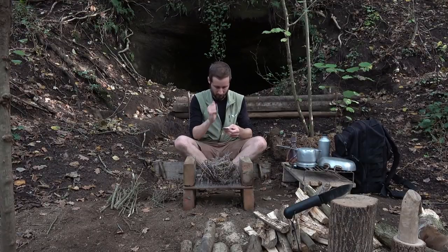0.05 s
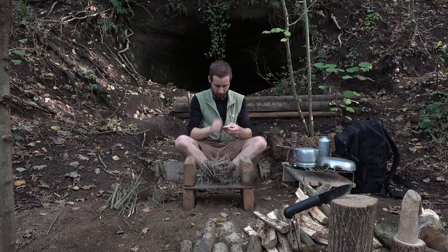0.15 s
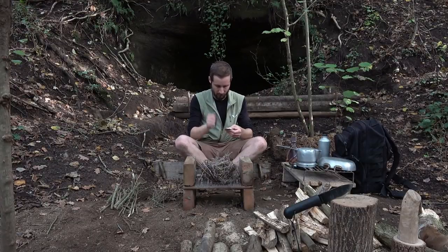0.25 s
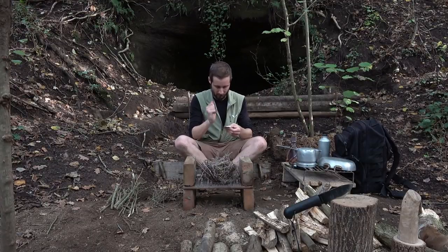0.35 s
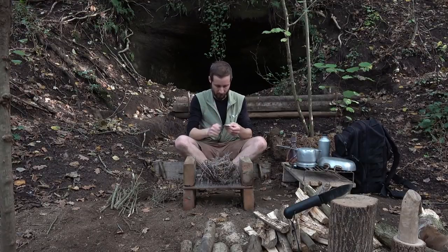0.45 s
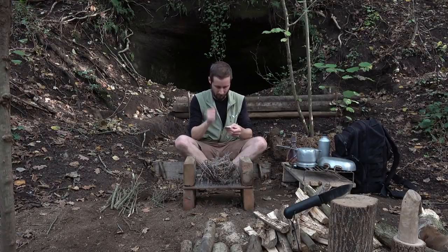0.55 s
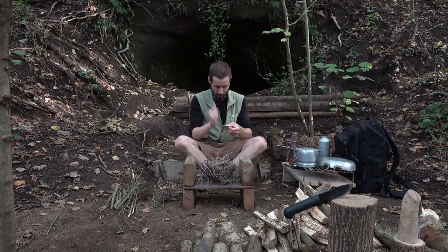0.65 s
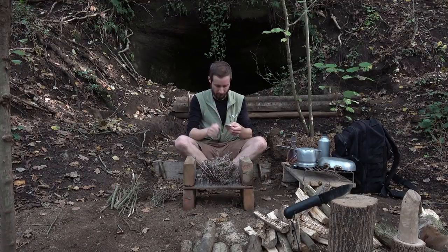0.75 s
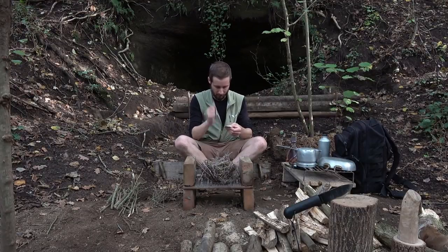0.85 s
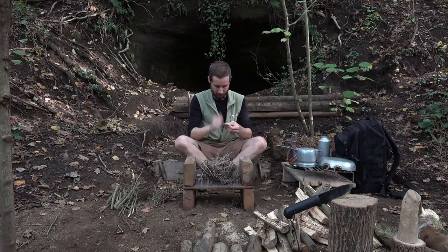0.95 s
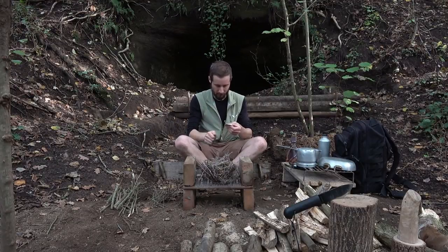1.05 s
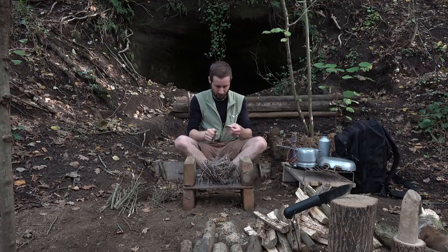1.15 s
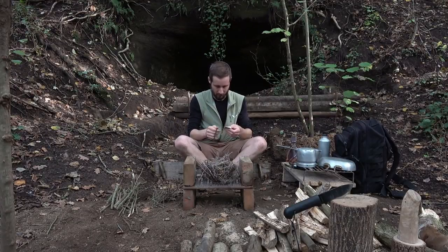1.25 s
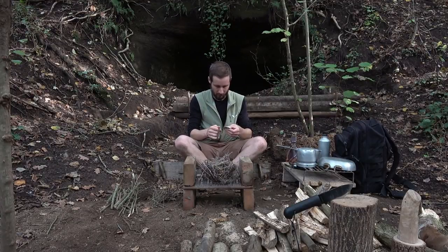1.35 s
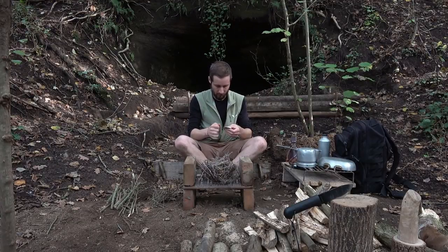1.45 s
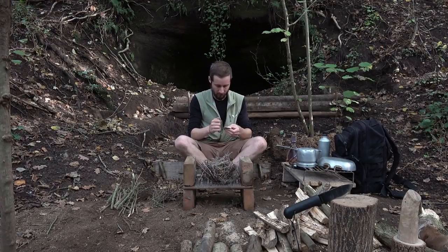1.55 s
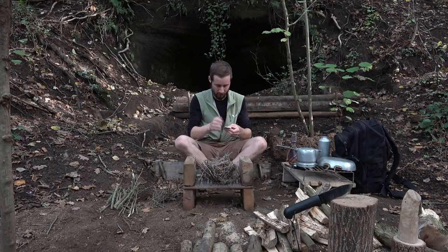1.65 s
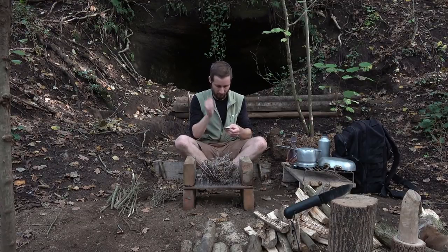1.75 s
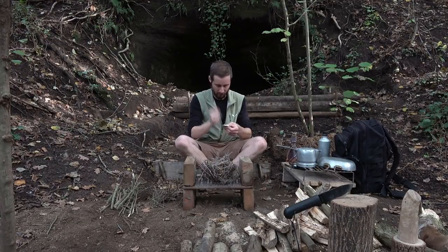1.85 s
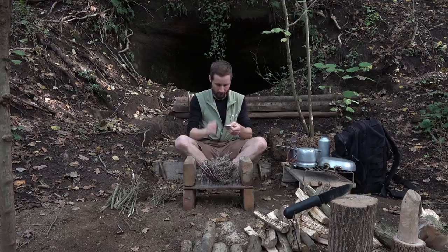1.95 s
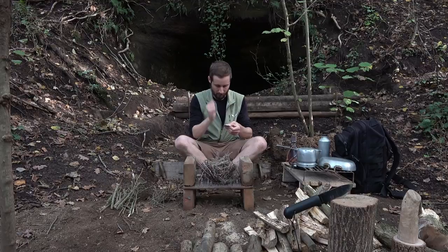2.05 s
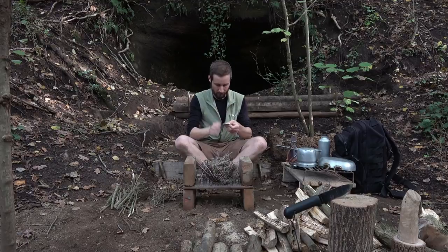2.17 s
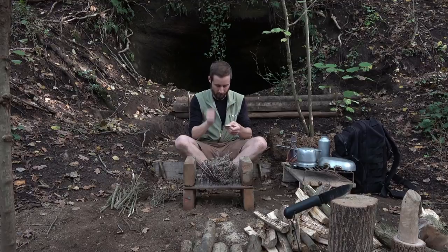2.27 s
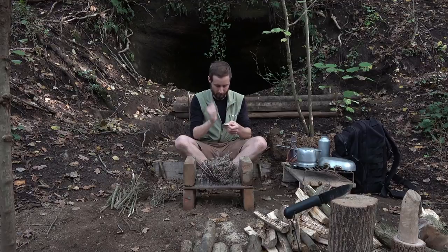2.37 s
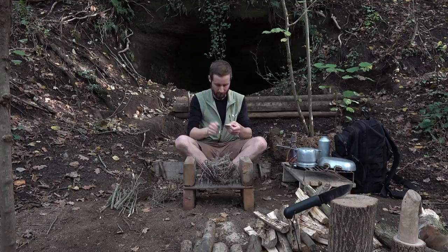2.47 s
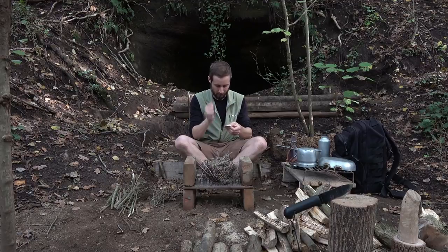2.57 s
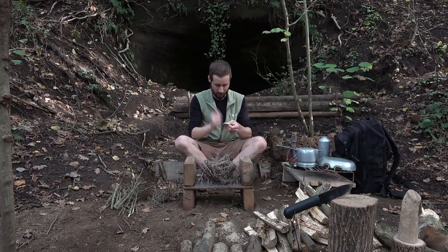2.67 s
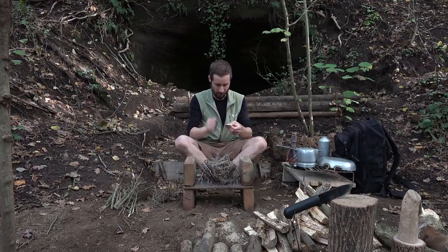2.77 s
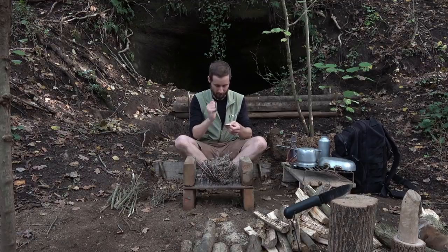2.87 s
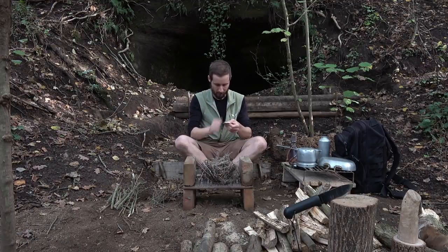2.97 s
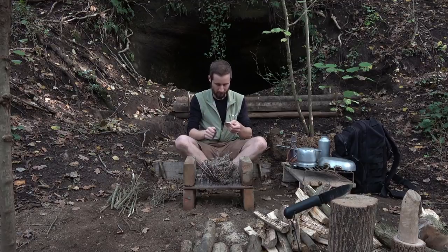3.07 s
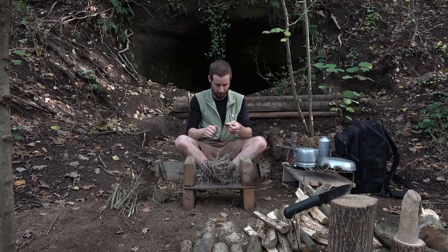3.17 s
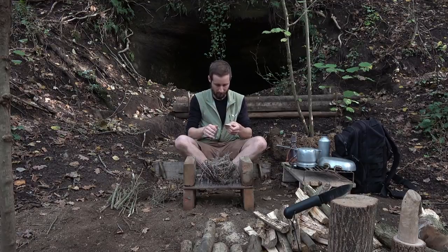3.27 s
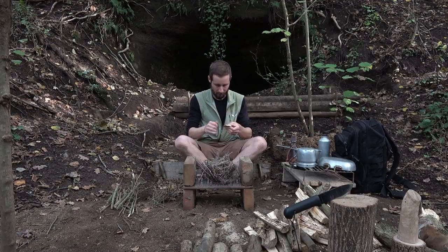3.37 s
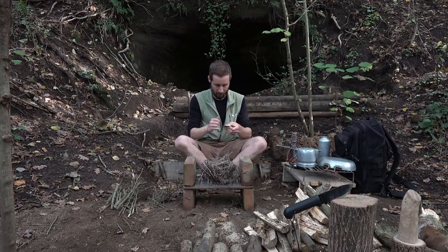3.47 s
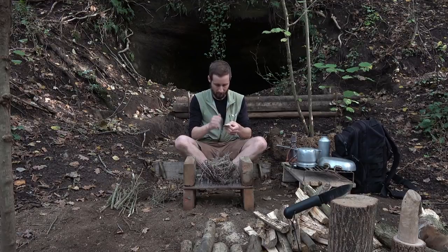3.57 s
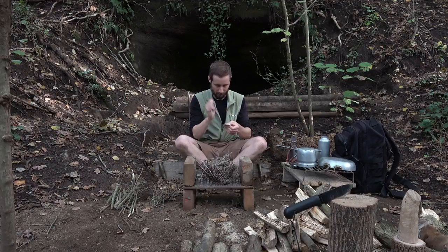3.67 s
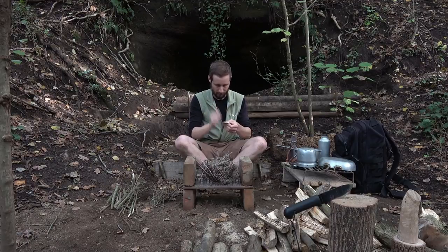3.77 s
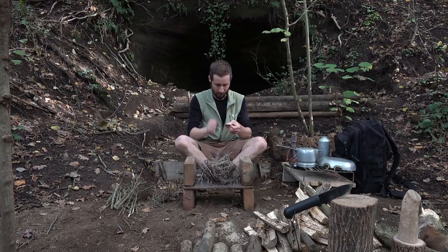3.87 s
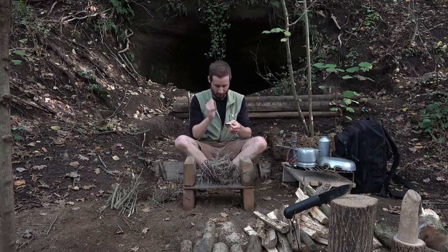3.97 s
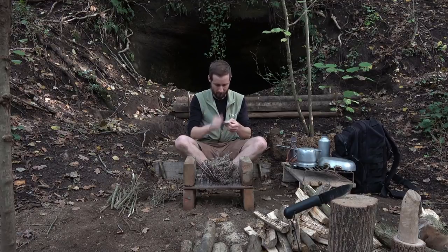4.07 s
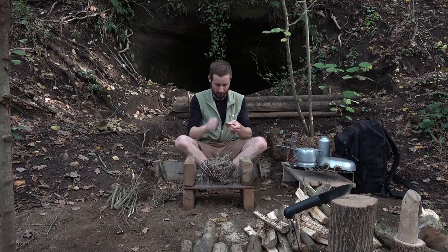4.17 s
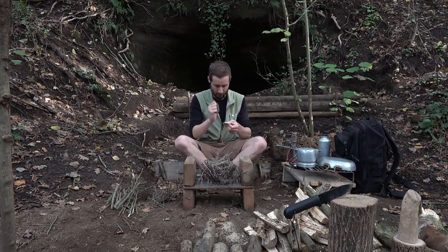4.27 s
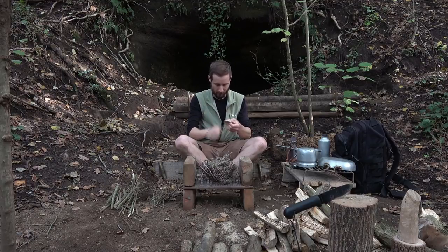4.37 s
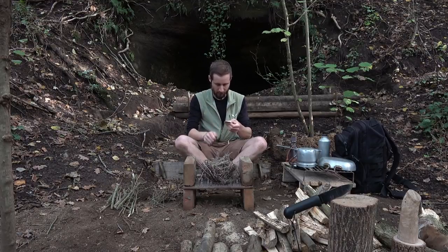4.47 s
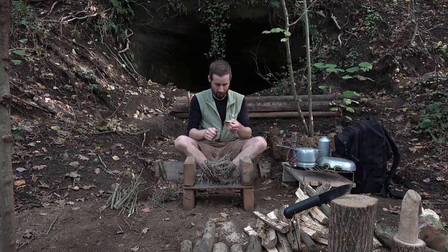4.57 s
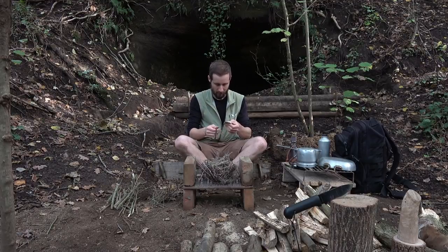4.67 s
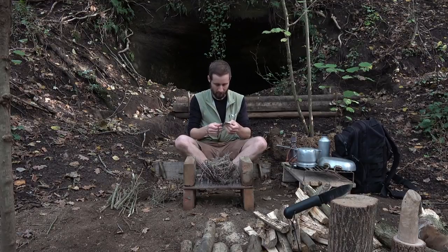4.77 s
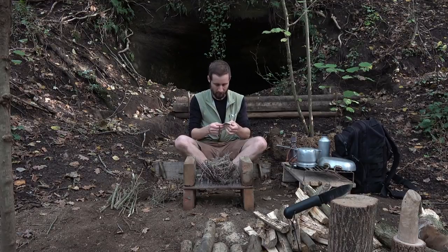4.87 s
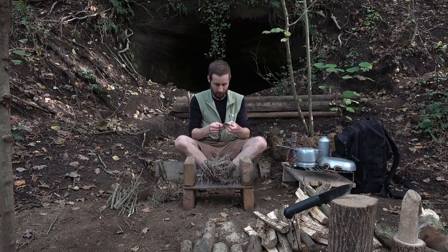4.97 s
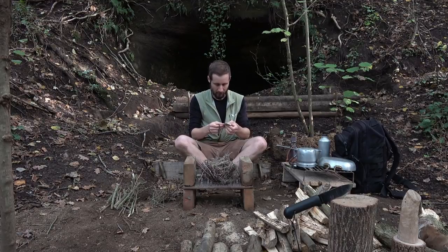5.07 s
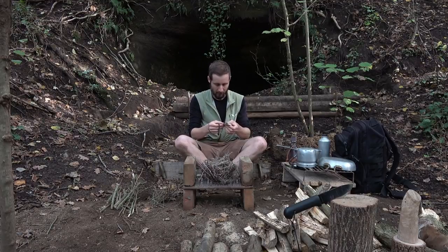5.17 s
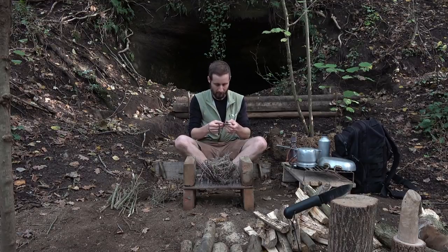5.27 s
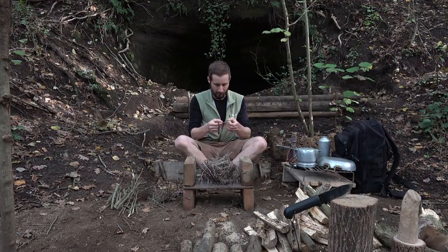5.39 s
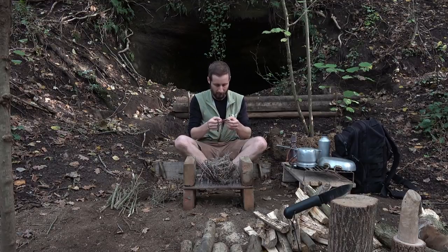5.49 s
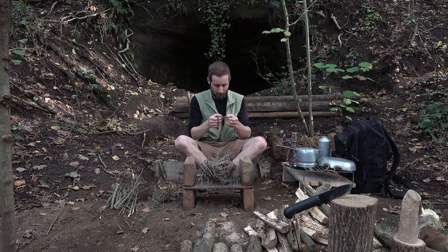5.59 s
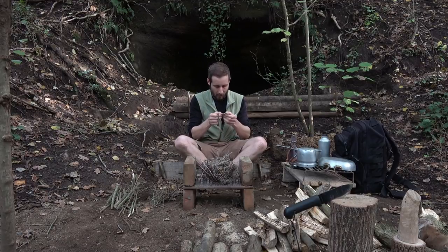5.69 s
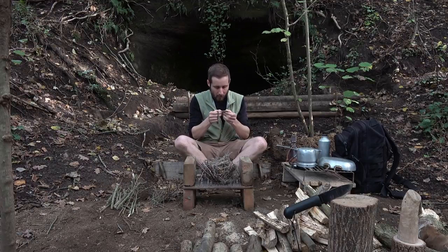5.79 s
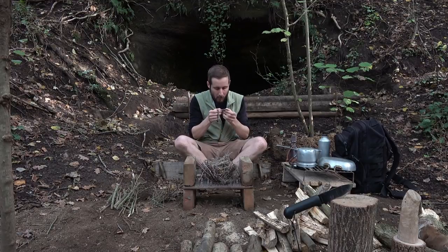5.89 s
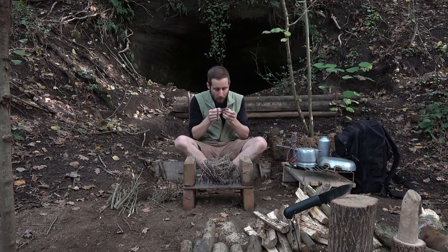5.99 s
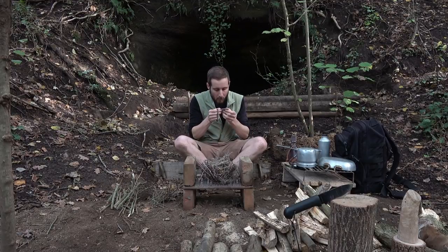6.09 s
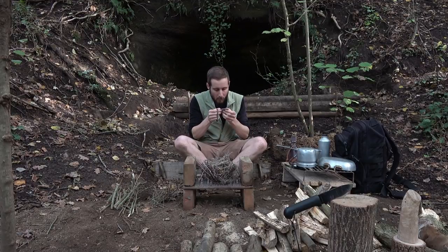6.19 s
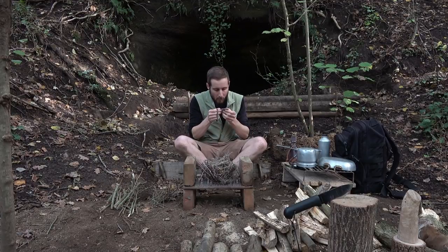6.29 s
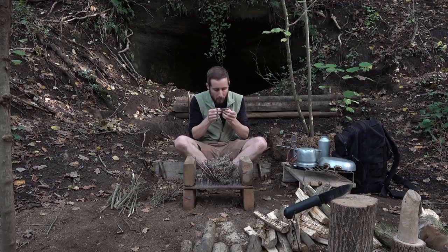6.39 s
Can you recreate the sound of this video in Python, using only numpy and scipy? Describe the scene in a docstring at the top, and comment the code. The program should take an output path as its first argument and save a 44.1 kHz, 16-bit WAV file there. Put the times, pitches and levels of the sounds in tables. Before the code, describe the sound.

Sharp, bright clinks of steel struck against flint come in three short, even runs over still woodland air.

```python
"""A steel striker hits a flint in three bursts, a few metres away in a woodland hollow.
Each stroke is a sharp blow; the steel then chatters along the stone's edge and clinks.
Afterwards the flint ticks once in the fingers. Ground, banks and trees scatter the sound.
Underneath: still forest air and a brief low rumble."""
import sys
import numpy as np
from scipy import signal
from scipy.fft import rfft, irfft
from scipy.io import wavfile

SR = 44100
rng = np.random.default_rng(int(sys.argv[2]) if len(sys.argv) > 2 else 0)


def materialize(psi):
    """Save the field psi as 16-bit PCM at rate SR to the path in sys.argv[1].

    A 1-D psi becomes a single channel; in a 2-D psi each row is a channel.
    """
    bounded = np.clip(np.atleast_2d(psi).T, -1, 1)
    quanta = np.round(bounded * 32767).astype(np.int16)
    wavfile.write(sys.argv[1], SR, quanta)


N = 283994


def stroke(strength_db, length_s, scrape_db, glance_db, clink_db, note_hz, note_db):
    """Blow and scrape ring steel and flint. Returns the direct sound and that sent into the wood."""
    # short-lived peaks colouring the direct crack, partly from reflections off hands, knees
    # and ground: f/Hz, width/Hz, gain/dB
    colour_peaks = [(320, 160, -16), (945, 130, 7.5), (1480, 480, 10.5), (2180, 410, 10), (3180, 210, 6.5),
                    (4320, 150, 7.5), (5100, 1600, 10), (5220, 230, 0), (6200, 130, -11.5), (8000, 830, 5),
                    (9090, 240, -5), (12100, 2300, -2.5), (12700, 2000, -1), (15500, 630, -2)]
    # steel modes (finger-damped clink, highest pings, lower ring): f/Hz, level/dB, t60/s
    clink_modes = [(7150, -4, .04), (7220, 0, .052), (7295, -1, .056), (7370, -2, .048), (7480, -6, .025),
                   (7950, -8, .003)]
    ping_modes = [(9110, -2, .05), (12950, -1, .045), (15230, 0, .055), (15400, -3, .04)]
    low_modes = [(4420, -5, .05), (4570, -1, .1), (4750, 1, .14), (4880, -2, .06), (5030, -3, .05),
                 (5220, -5, .04)]
    t = np.arange(SR // 5) / SR
    bands_db, ring_db, ping_db = voicing(strength_db, length_s, scrape_db, glance_db)
    force = unit_energy(blow(t)) + from_db(scrape_db) * unit_energy(scrape(t, length_s))
    clink = at_level(ring(force, clink_modes, detune=.0023), strength_db + clink_db)
    ping = at_level(ring(force, ping_modes, vary_db=3.5, detune=.0053), ping_db)
    low_ring = at_level(ring(force, low_modes, vary_db=3, detune=.0034), ring_db)
    # the flint's own note, set by where it is hit and how it is held
    note = at_level(ring(force, [(note_hz, 0, .024)]), strength_db + note_db)
    tones = clink + ping + note
    coloured = detour_notches(resonate(force, colour_peaks))
    ahead = balance_bands(coloured, *bands_db) + tones + from_db(-9.5) * low_ring
    around = balance_bands(force, *bands_db) + from_db(-3) * tones + low_ring
    return ahead, around


def voicing(strength_db, length_s, scrape_db, glance_db, usual_db=-36, contact_loss_db_per_s=279.5):
    """Levels/dB of a stroke. A hard, clean blow cracks more and knocks less; contact damps the ring."""
    harder_db = strength_db - usual_db
    tilt_db = 1.19 + .12 * harder_db - .13 * scrape_db
    bands_db = strength_db + np.array([-tilt_db, tilt_db, glance_db])   # knock, crack, fizz
    ring_db = strength_db - 2.5 - contact_loss_db_per_s * length_s
    ping_db = strength_db - 6.5 + glance_db - .61 * harder_db
    return bands_db, ring_db, ping_db


def blow(t, smear_s=.0014, bounce=.55):
    """One hard impact, smeared by rebounds and by nearby hands and knees."""
    force = signal.unit_impulse(len(t))
    for k in range(3):   # all-pass stages
        gap = np.zeros(int(SR * smear_s * rng.uniform(.8, 1.2) / 2 ** k))
        force = signal.lfilter(np.r_[-bounce, gap, 1], np.r_[1, gap, -bounce], force + 1e-18)
    return cut(force, 100, "high", order=1)


def scrape(t, length_s, slip_s=.0032, slip_decay_s=.0014, fade_db=6.5, low_hz=1200):
    """Steel catches and slips along the edge; each slip breaks off a puff of grit."""
    slips_s = slip_s + np.cumsum(np.r_[0, slip_s * rng.uniform(.55, 1.45, 15)])
    sizes = from_db(2 * rng.standard_normal(len(slips_s)) - fade_db * slips_s / length_s)
    pressure = sum(size * (t >= s) * np.exp(-abs(t - s) / slip_decay_s)
                   for s, size in zip(slips_s, sizes) if s <= max(length_s, slip_s))
    return cut(grit(t, per_s=12000, spread_db=3) * pressure, low_hz, "high")


def grit(t, per_s, spread_db):
    """Impulses of uneven size at random times."""
    hits = rng.random(len(t)) < per_s / SR
    signs = rng.choice([-1, 1], len(t))
    return hits * signs * from_db(spread_db * rng.standard_normal(len(t)))


def ring(force, modes, vary_db=0, detune=0, skirt_hz=500):
    """Decaying modes; the grip varies level and pitch per stroke by vary_db and detune."""
    out = 0
    for hz, db, t60_s in modes:
        hz = hz * (1 + detune * rng.normal())
        r, w = from_db(-60 / (t60_s * SR)), 2 * np.pi * hz / SR
        mode = signal.lfilter([1], [1, -2 * r * np.cos(w), r * r], force + 1e-18)
        mode = resonate(mode, [(hz, skirt_hz, 0)])   # brief swell, narrow spectrum
        out = out + from_db(db + vary_db * rng.normal()) * unit_energy(mode)
    return out


def balance_bands(x, knock_db, crack_db, fizz_db, knock_hz=2700, fizz_hz=10000):
    """Set three band levels: a square blow knocks, a glancing one is thin and fizzes."""
    knock, rest = cut(x, knock_hz, "low", order=5), cut(x, knock_hz, "high", order=5)
    crack, fizz = cut(rest, fizz_hz, "low", order=5), cut(rest, fizz_hz, "high", order=5)
    return at_level(knock, knock_db) + at_level(crack, crack_db) + at_level(fizz, fizz_db)


def detour_notches(x):
    """Detours past hands and knees meet the direct sound out of phase."""
    # cancelled bands: f/Hz, width/Hz
    notches = [(620, 160), (1135, 150), (1750, 150), (5900, 200), (10100, 1200)]
    for hz, width_hz in notches:
        x = signal.lfilter(*signal.iirnotch(hz, hz / width_hz, fs=SR), x + 1e-18)
    return x


def flint_tick(db, soft_hz=3900):
    """A light, dull touch of the stone in the fingers."""
    # flint resonances: f/Hz, width/Hz, gain/dB
    flint_bands = [(1990, 95, 2.06), (2310, 142, 11), (2820, 160, 9.9), (3340, 90, 5.7)]
    touch = blow(np.arange(SR // 10) / SR, smear_s=.0002)
    return at_level(cut(resonate(touch, flint_bands), soft_hz, "low", order=8), db)


def near_echoes(x, gain_db=-14.5, decay_s=.018, low_hz=1100):
    """Nearby ground, logs and camp gear return a quick spray of echoes."""
    t = np.arange(SR // 5) / SR
    spray = grit(t, per_s=2600, spread_db=1) * (t > .005) * np.exp(-t / decay_s)
    response = unit_energy(cut(spray, low_hz, "high"))
    return from_db(gain_db) * signal.fftconvolve(x, response)[:len(x)]


def woodland(x, gain_db=-17, build_s=.0064):
    """Banks and trunks give a diffuse tail that dies band by band."""
    # scatter: f/Hz, relative density/dB, t60/s
    scatter = [(300, -17.5, 0.16), (900, -9, 0.33), (1600, -9, 0.5), (2960, -5, .46), (4030, 3.5, 0.21),
               (4750, 3.5, 0.47), (6400, 0.5, 0.42), (7100, -0.5, 0.43), (8000, -5, 0.47),
               (10000, -7.5, 0.23), (12500, -7.5, 0.61), (14100, -6, 0.35), (15300, 3, 0.32)]
    t = np.arange(SR * 3 // 4) / SR
    edges_hz = np.geomspace(250, 17000, 37)
    tail = 0
    for low, high in zip(edges_hz, edges_hz[1:]):
        hz = np.sqrt(low * high)
        decay = from_db(at_hz(scatter, hz) - 60 * t / at_hz(scatter, hz, column=2))
        tail = tail + cut(rng.standard_normal(len(t)), [low, high], "band") * decay
    tail = tail * (1 - np.exp(-(t / build_s) ** 2))
    return from_db(gain_db) * signal.fftconvolve(x, unit_energy(tail))[:len(x)]


def rumble(attack_s=.035, release_s=.065):
    """Swells of low noise rise, hold and die away."""
    # swells: t/s, hold/s, level/dB
    swells = [(2.19, .025, -55.5), (2.32, 1.2, -72.5), (3.61, .03, -68.5)]
    # rumble spectrum: f/Hz, relative density/dB
    spectrum = [(30, -23), (55, -9), (78, -3), (120, -4.5), (180, -12.5), (300, -22), (700, -24.5),
                (2000, -72)]
    t = np.arange(N) / SR
    envelope = 0
    for s, hold_s, db in swells:
        before_s, after_s = np.maximum(s - t, 0), np.maximum(t - s - hold_s, 0)
        envelope = envelope + from_db(db) * np.exp(-before_s / attack_s - after_s / release_s)
    return envelope * noise(spectrum)


def forest_air(level_db=-69.5):
    """Still air: faint, steady, mostly low noise."""
    # air spectrum: f/Hz, relative density/dB
    spectrum = [(13, -41), (22, -3), (55, -5), (109, -11.5), (229, -14), (270, -17), (310, -17), (815, -19),
                (1540, -26), (1860, -29), (3150, -32.5), (8490, -36), (14700, -40.5), (16000, -46)]
    return from_db(level_db) * noise(spectrum)


def noise(spectrum):
    """Steady coloured noise, rms 1."""
    hz = np.maximum(np.fft.rfftfreq(N, 1 / SR), 1)
    shaped = rfft(rng.standard_normal(N)) * from_db(at_hz(spectrum, hz))
    return np.sqrt(N) * unit_energy(irfft(shaped, N))


def resonate(x, bands):
    """Parallel resonators, each with its given peak gain."""
    out = 0
    for hz, width_hz, db in bands:
        r, w = np.exp(-np.pi * width_hz / SR), 2 * np.pi * hz / SR
        band = signal.lfilter([1, 0, -1], [1, -2 * r * np.cos(w), r * r], x + 1e-18)
        out = out + from_db(db) * (1 - r * r) / 2 * band
    return out


def cut(x, hz, kind, order=2):
    """Butterworth filter."""
    return signal.sosfilt(signal.butter(order, hz, kind, fs=SR, output="sos"), x + 1e-18)


def from_db(db):
    """Decibels to gain."""
    return 10 ** (np.asarray(db) / 20)


def unit_energy(x):
    """Scale to a sum of squares of 1."""
    return x / np.sqrt(np.sum(x ** 2) + 1e-20)


def at_level(x, db, stroke_s=.035):
    """Scale to the energy of rms level db held for stroke_s."""
    return unit_energy(x) * from_db(db) * np.sqrt(stroke_s * SR)


def at_hz(table, hz, column=1):
    """Interpolate a column over log frequency."""
    table = np.array(table)
    return np.interp(np.log(hz), np.log(table[:, 0]), table[:, column])


def add(out, x, start_s):
    """Mix x into out from start_s >= 0."""
    i = round(start_s * SR)
    part = x[:len(out) - i]
    out[i:i + len(part)] += part


def scene():
    """Steel and flint with their echoes, over rumble and forest air; mono."""
    # strokes: t/s, strength/dB, scrape length/s, scrape re blow/dB, glancing fizz/dB, clink/dB,
    # flint note f/Hz, note/dB; fizz, clink and note re strength
    strokes = [(-0.075, -42, 0.024, 7, -4, 9, 4620, -5), (0.198, -34.5, 0.033, -4.5, -7.5, 6.5, 3185, 0.5),
               (0.478, -34, 0.016, -4, -14, 5, 5500, -12),
               (0.7467, -36.5, 0.0096, -1, -5.5, -1.5, 5540, -13.5),
               (1.0139, -36.5, 0.018, 1, -6.5, 4, 4700, -3.5),
               (1.6633, -56, 0.019, -1.5, -15, 3, 4710, -4.5), (1.9273, -40, 0.021, 2, -2, 12, 3204, -3),
               (2.2088, -34, 0.0099, -4, -8.5, 7.5, 3690, -6.5),
               (2.4733, -35, .022, -2, -12.5, 9, 1990, -9), (2.7387, -41.5, 0.026, 6.5, 2.5, 14, 3174, 0),
               (3.0204, -37.5, .014, -6, -4.5, 10, 4770, -5), (3.5692, -56, .006, -7.5, -8, 7, 4674, 10.5),
               (3.843, -30.5, 0.0078, -11.5, -5, 5, 4990, -4.5),
               (4.1232, -36, 0.015, 6, -9, 5.5, 2200, -16), (4.3899, -34.5, .016, -0.5, -16, 4, 2140, -16)]
    # flint in the fingers: t/s, level/dB
    ticks = [(5.675, -60.5)]
    direct, scattered = np.zeros((2, SR + N))   # 1 s lead-in: striking is already under way
    for s, *settings in strokes:
        ahead, around = stroke(*settings)
        add(direct, ahead, 1 + s)
        add(scattered, around, 1 + s)
    for s, db in ticks:
        tick = flint_tick(db)
        add(direct, tick, 1 + s)
        add(scattered, from_db(-8) * tick, 1 + s)   # share that gets past the cupped hands
    striking = direct + near_echoes(direct) + woodland(scattered)
    return (striking[SR:] + rumble() + forest_air())[None]


def record(dry):
    """Steep low-pass at 15.8 kHz."""
    return signal.sosfilt(signal.ellip(10, .2, 80, 15800, fs=SR, output="sos"), dry)


dry = scene()
out = record(dry)
materialize(out)
```